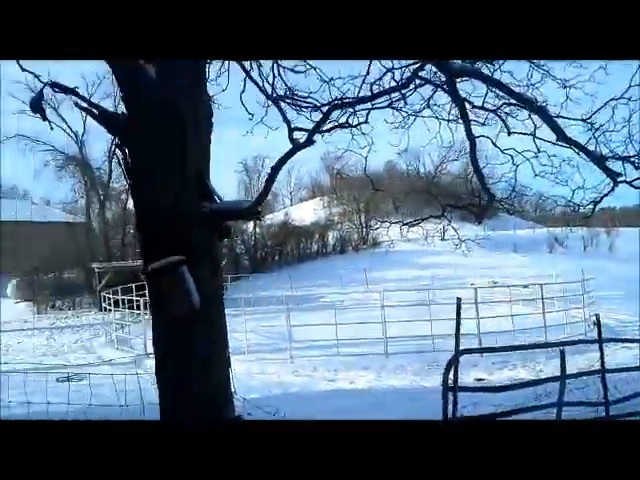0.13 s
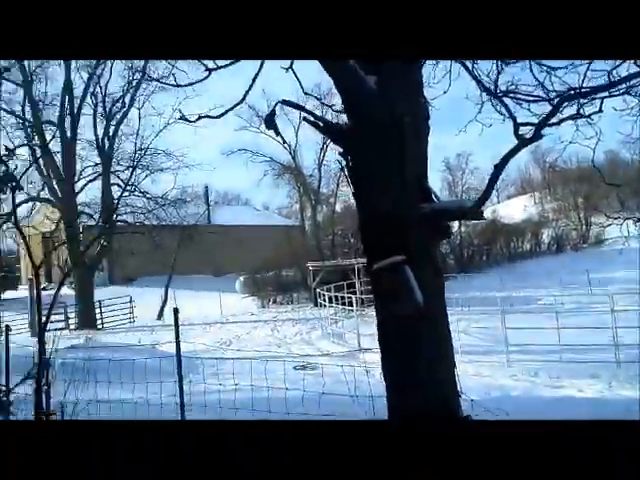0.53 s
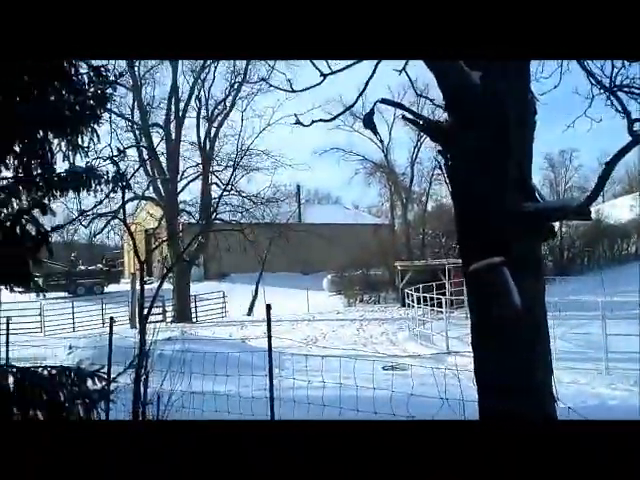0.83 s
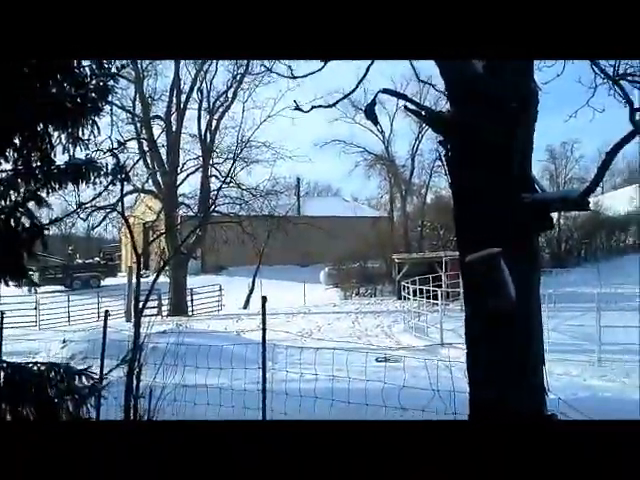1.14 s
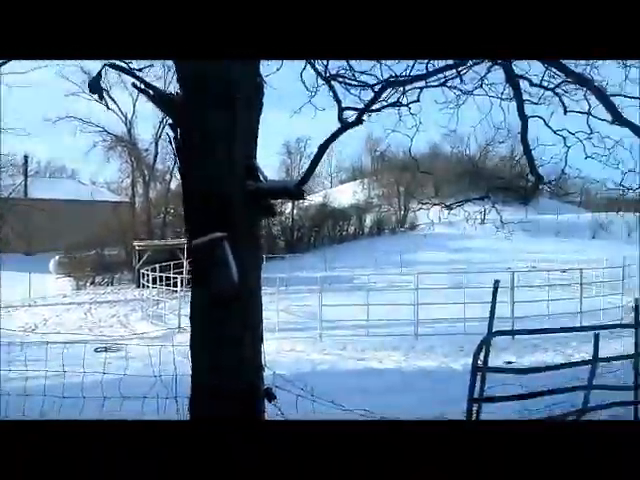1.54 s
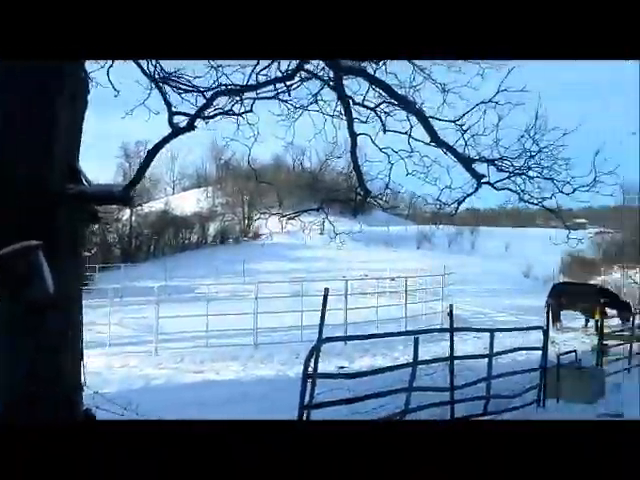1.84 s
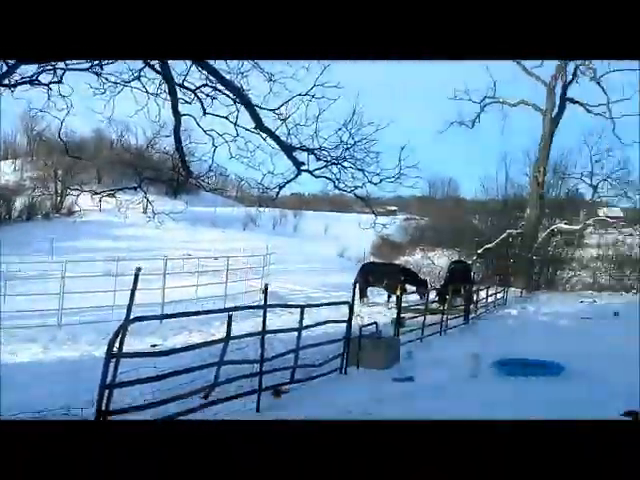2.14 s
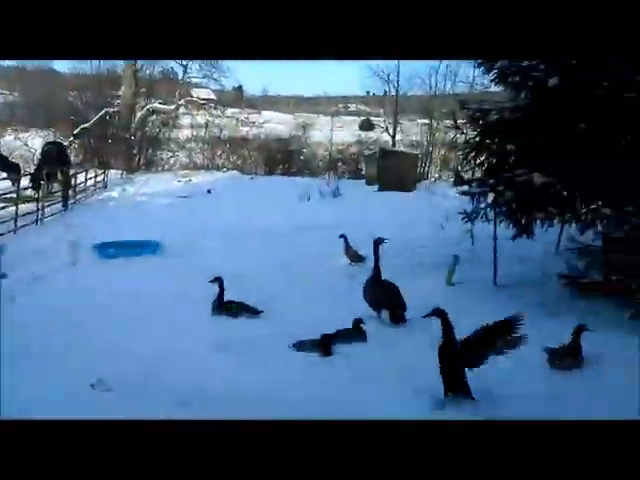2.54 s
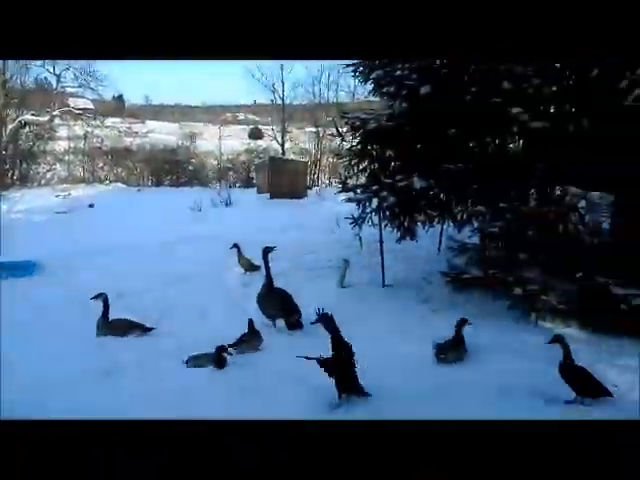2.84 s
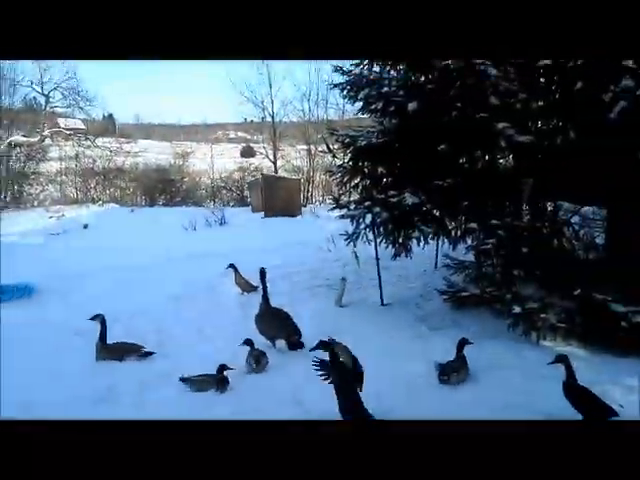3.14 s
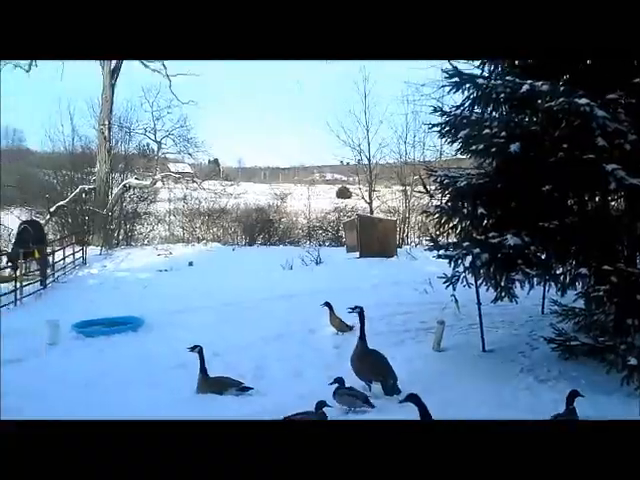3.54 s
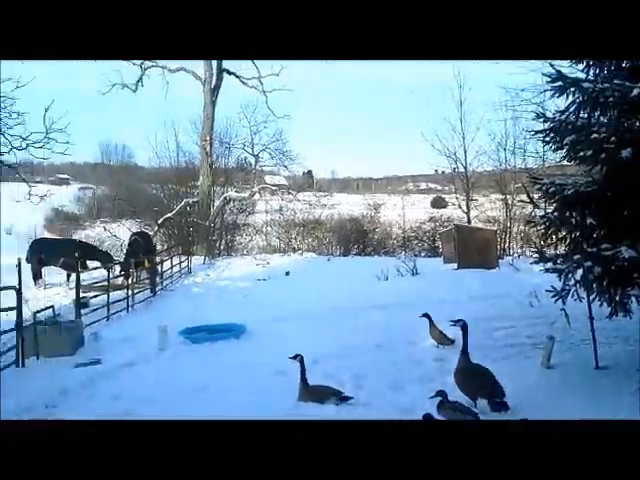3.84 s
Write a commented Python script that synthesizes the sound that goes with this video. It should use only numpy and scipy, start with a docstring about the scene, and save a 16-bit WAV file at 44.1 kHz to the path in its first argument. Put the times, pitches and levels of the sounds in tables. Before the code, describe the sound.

Goose honks, loud and rough, break out in short separate bursts across a quiet snowy yard.

```python
"""Geese in a snowy farmyard

Geese honk: grouped membrane pulses growl through throat and beak, then break into overtones that sag at the end.
A second goose answers, and ducks and far birds quack in short pulse trains through a bill resonance.
Snow crunches in bursts of coloured noise; wind rumbles and puffs on the microphone over an outdoor hiss.
Ground, fences, barn and slope return delayed copies, and the yard adds scattered noise-tail echoes."""
import sys
import numpy as np
from scipy import signal
from scipy.fft import rfft, irfft, next_fast_len
from scipy.io import wavfile
from scipy.ndimage import map_coordinates

SR = 44100
rng = np.random.default_rng(int(sys.argv[2]) if len(sys.argv) > 2 else 0)


def dump_mix(stems):
    """Bounce the given channels to the path in sys.argv[1] as a 16-bit WAV at rate SR."""
    frames = np.atleast_2d(stems).T  # one column per channel
    limited = np.clip(frames, -1, 1)  # hard clip at full scale
    pcm = np.round(limited * 32767).astype(np.int16)
    wavfile.write(sys.argv[1], SR, pcm)


N = 176400

# reflections off ground and fences close to the birds: (delay [s], level [dB])
EARLY_ECHOES = [(.0021, -7.5), (.0047, -14.5), (.0083, -17), (.013, -23.5), (.019, -13.5)]


def amp(db):
    """Decibels to an amplitude factor."""
    return 10 ** (np.asarray(db) / 20)


def unit(x):
    """x scaled to rms 1."""
    return x / np.sqrt(np.mean(x ** 2) + 1e-20)


def along(points, hz):
    """Interpolates (Hz, value) points on a log frequency axis."""
    f, v = np.transpose(points)
    return np.interp(np.log(hz + 1), np.log(f + 1), v)


def stretch(rows):
    """First sample, and one value per sample for each column after the time."""
    s, *cols = np.transpose(rows)
    start = round(s[0] * SR)
    t = np.arange(start, min(N, round(s[-1] * SR))) / SR
    return start, [np.interp(t, s, c) for c in cols]


def wobble(n, rate):
    """A smooth random curve, rate knots a second."""
    knots = rng.standard_normal(int(n * rate / SR) + 4)
    return map_coordinates(knots, [np.arange(n) * rate / SR])


def filtered(x, response):
    """x times a complex response of frequency."""
    n = x.shape[-1]
    m = next_fast_len(n + 8192)
    return irfft(rfft(x, m) * response(np.fft.rfftfreq(m, 1 / SR)), m)[..., :n]


def resonant(x, peaks):
    """x through parallel squared band-passes (centre Hz, width Hz, dB) of alternating sign, rms 1."""
    def band(f, centre, width):
        return 1j * f * width / (centre * centre - f * f + 1j * f * width)

    def response(f):
        return sum((-1) ** k * amp(db) * band(f, centre, width) ** 2
                   for k, (centre, width, db) in enumerate(peaks))

    return unit(filtered(x, response))


def coloured(spectrum, n=N):
    """Noise of rms 1 shaped by a (Hz, dB) spectrum."""
    return unit(filtered(rng.standard_normal(n), lambda hz: amp(along(spectrum, hz))))


def add(track, start, x):
    """Mixes x in, with 2 ms fades at its ends."""
    edge = np.arange(len(x))
    fade = np.clip(np.minimum(edge, edge[::-1]) / 90, 0, 1)
    track[start:start + len(x)] += (x * fade)[:len(track) - start]


def copies(x, echoes):
    """Delayed, weaker copies of x, alternate ones inverted, as from single reflecting surfaces."""
    return filtered(x, lambda hz: sum((-1) ** k * amp(db) * np.exp(-2j * np.pi * hz * s)
                                      for k, (s, db) in enumerate(echoes)))


def hiss():
    """The outdoor floor: coloured noise whose level drifts."""
    # floor level: (time [s], level [dB])
    hiss_level = [(0, -49.5), (.3, -47), (.6, -52.5), (.85, -59), (1.0, -56.5), (1.6, -52), (1.9, -53.5),
                  (2.2, -54.5), (2.4, -49.5), (2.6, -45), (3.1, -44), (3.3, -54), (3.45, -55), (4, -44.5)]
    # relative spectrum of the floor: (frequency [Hz], density [dB per Hz])
    hiss_spectrum = [(180, -22.5), (300, -13.5), (353, -3), (784, -6.5), (865, -21), (1050, -6.5),
                     (1690, -8.5), (3630, -13.5), (7670, -10.5), (14700, -23)]
    _, (db,) = stretch(hiss_level)
    db = np.pad(db, (0, N - len(db)), "edge")
    return amp(db + 1.5 * wobble(N, 6.6)) * coloured(hiss_spectrum)


def wind():
    """Wind on the microphone: a lumpy noise rumble, with brief low swings standing out as puffs."""
    # rumble level: (time [s], level [dB])
    rumble_level = [(0, -42), (.05, -40.5), (.19, -49.5), (.28, -45.5), (.42, -42.5), (.5, -57), (.57, -52),
                    (.64, -56), (.79, -62), (.87, -54.5), (1.1, -66), (1.32, -73), (1.4, -58.5), (1.6, -59),
                    (1.66, -48), (1.72, -53), (1.8, -37), (1.88, -53.5), (1.97, -37.5), (2.04, -51),
                    (2.1, -52), (2.3, -52), (2.36, -46.5), (2.44, -54), (2.5, -69), (2.6, -40.5),
                    (2.72, -36), (2.83, -57), (3.0, -44.5), (3.33, -52), (3.41, -61), (3.48, -45.5),
                    (3.85, -48.5), (3.96, -35), (4, -43)]
    # relative spectrum of the rumble: (frequency [Hz], density [dB per Hz])
    rumble_spectrum = [(15, -56.5), (25, -29.5), (59, -11.5), (147, 8), (292, 5.5), (425, -0.5), (609, -7),
                       (900, -7), (1170, -52), (1980, -120)]
    # single puffs: (time [s], envelope peak [dB], frequency [Hz])
    puff_rows = [(0.023, -33, 292), (0.042, -27.5, 270), (0.089, -22, 334), (0.241, -23.5, 325),
                 (0.273, -33, 226), (0.304, -26.5, 290), (0.356, -22, 301), (0.403, -26.5, 252),
                 (0.552, -30, 218), (0.583, -25.5, 262), (1.374, -38, 302), (1.645, -16, 231),
                 (1.684, -31, 197), (1.788, -27.5, 358), (1.807, -25, 326), (1.834, -23, 334),
                 (1.85, -54, 151), (1.904, -28.5, 250), (1.979, -37, 164), (2.009, -30.5, 274),
                 (2.101, -29, 326), (2.345, -24.5, 214), (2.408, -28.5, 288), (2.613, -13, 376),
                 (3.053, -22.5, 343)]
    lump_db = 4
    puff_cycles, puff_rise_s = 0.56, 0.00451  # Gaussian 1/e half-width in cycles, time from onset to centre
    _, (db,) = stretch(rumble_level)
    db = np.pad(db, (0, N - len(db)), "edge")
    lumpy = amp(lump_db * wobble(N, 35)) * coloured(rumble_spectrum)
    out = amp(db) * unit(lumpy)
    t = np.arange(-600, 600) / SR
    for s, peak_db, hz in puff_rows:
        swing = np.sin(2 * np.pi * hz * t + rng.uniform(0, 2 * np.pi))
        puff = np.exp(-(t * hz / puff_cycles) ** 2) * swing
        add(out, max(0, round((s + puff_rise_s) * SR) - 600), amp(peak_db) * puff)
    return out


def yard(x, share, delay_s):
    """Scattered echoes; each frequency dies at its own speed, and moving air blurs the lines."""
    # yard decay time before scaling by share: (frequency [Hz], t60 [s])
    yard_t60 = [(400, 0.4), (1300, 0.65), (4000, 0.43), (8000, 0.41), (13000, 0.26)]
    # tone of what the yard sends back: (frequency [Hz], gain [dB])
    echo_colour = [(600, -1.5), (1300, -3), (3000, 4), (7000, 0.5), (12000, 8.5)]
    blur, blur_rate = .18, 70  # amplitude depth, knots a second
    blurred = x * (1 + blur * wobble(N, blur_rate))
    hz, t, z = signal.stft(rng.standard_normal(SR), SR, nperseg=256)
    decay = amp(-60 * t / (share * along(yard_t60, hz)[:, None]))
    tail = signal.istft(z * decay, SR, nperseg=256)[1]
    tinted = filtered(blurred, lambda f: amp(along(echo_colour, f)))
    delayed = np.pad(tinted, (round(delay_s * SR), 0))
    return signal.fftconvolve(delayed, tail / np.linalg.norm(tail))[:N]


def crunches():
    """Snow under feet: short bursts of coloured noise with fast rise, slower decay and a gritty level."""
    # snow crunches: (onset [s], nominal level [dB], nominal length [s])
    crunch_rows = [(0.094, -45, 0.03), (0.257, -39, 0.037), (0.286, -37.5, 0.045), (0.5, -49, 0.016),
                   (0.866, -54, 0.019), (2.231, -44.5, 0.02), (2.942, -31, 0.013), (2.996, -34, 0.016),
                   (3.097, -31, 0.035)]
    # relative spectrum of crushed snow: (frequency [Hz], density [dB per Hz])
    crunch_spectrum = [(290, -32), (500, -4), (1630, 2.5), (1780, -7), (4020, -4.5), (7580, 2),
                       (14500, -21)]
    out = np.zeros(N)
    for s, db, length in crunch_rows:
        t = np.arange(round(3 * length * SR)) / SR
        u = t / (0.15 * length)
        grit = amp(db + 6 + 4.3 * wobble(len(t), 1033))
        add(out, round(s * SR), grit * u * np.exp(-u) * coloured(crunch_spectrum, len(t)))
    return out


def pulses(rate_hz, group, between_db, rough, sharp):
    """Unsteady membrane pulses in groups, mixed with noise gated once a group: throat and beak feeds."""
    jitter, scatter_db = .006, 1.5  # relative wander of the rate, wander of the level
    even_hz = 1060  # above this the lines between the pulse harmonics draw level with them
    n = len(rate_hz)
    unsteady_hz = rate_hz * (1 + jitter * (1 + 3 * rough) * wobble(n, 122.4))
    turns = np.cumsum(unsteady_hz) / SR
    k = np.arange(1, int(12000 / rate_hz.max()))[:, None]
    between = amp(between_db * np.minimum(1, even_hz / (k * rate_hz.mean())))
    lines = np.where(k % group == 0, 1, between) * np.cos(2 * np.pi * k * turns)
    clean = unit(lines.sum(0))
    gate = np.exp(sharp * np.cos(2 * np.pi * turns))
    gated = unit(gate * rng.standard_normal(n))
    rough = np.clip(rough, 0, 1)
    size = amp(scatter_db * wobble(n, 157.4))
    low = size * np.sqrt(1 - rough) * clean + np.sqrt(rough) * gated
    high = size * (1 - rough) * clean + gated
    return low, high


def quacks():
    """Ducks and far birds: short nasal pulse trains of falling rate through bill resonances."""
    # calls: (onset [s], length [s], mid-call pulse rate [Hz], level [dB], treble [dB],
    # roughness [0-1], bill resonance [Hz])
    quack_rows = [(0.034, 0.055, 760, -44, -12, 0.65, 1500), (0.379, 0.062, 757, -44, -14, 0.27, 2140),
                  (0.529, .13, 90.5, -53, -6.5, 0.9, 1680), (0.719, 0.076, 89.6, -53.5, -27, 0.3, 1790),
                  (1.008, 0.057, 383.5, -41, -31, 0.2, 1400), (1.408, 0.066, 103, -39.5, -7, 0.76, 1730),
                  (1.61, 0.0727, 84.9, -45.5, -6, 0.8, 1900), (1.728, 0.09, 247.2, -34.5, -6, 0.46, 2020),
                  (2.016, 0.072, 74.6, -56, -25.5, 0.4, 1500), (2.082, 0.082, 74.4, -51, -14, 0.54, 1770),
                  (2.782, 0.097, 106.5, -41, -20, 0.13, 2800), (2.938, 0.036, 208.6, -33.5, -6, 0.77, 2040),
                  (2.962, 0.043, 210.7, -30.5, -0.5, 0.76, 2030), (3.379, 0.17, 100.8, -53, -29, 0.8, 1500)]
    bill_width = .24  # of the resonance frequency
    rise_s, fall_s, floor = 0.03, 0.018, .25  # the rise starts from the floor
    out = np.zeros(N)
    for s, length, rate, db, treble, rough, hz in quack_rows:
        t = np.arange(round(length * SR)) / SR
        glide = 1.04 - .08 * t / length + 0.0397 * wobble(len(t), 89.6)
        low, high = pulses(rate * glide, 1, 0 * t, rough + 0 * t, sharp=0.55)
        bill = [(0.37 * hz, 450, -2), (0.73 * hz, 450, -2), (hz, bill_width * hz, 0),
                (1.335 * hz, 600, -7), (1.93 * hz, 1500, -13)]
        swell = np.clip(np.minimum(t / rise_s + floor, (length - t) / fall_s), 0, 1)
        shape = swell * amp(1.8 * wobble(len(t), 54))
        nasal = resonant(low, bill)
        bright = resonant(high, [(5450, 2700, 4.8), (6740, 3100, 0.5)])
        # the treble follows the shape twice, so it swells later and fades sooner
        add(out, round(s * SR), amp(db) * shape * (nasal + amp(treble) * shape * bright))
    return out + .6 * copies(out, EARLY_ECHOES)


def growls():
    """The rough start of each honk: grouped pulses through a throat and beak that open when loud."""
    # growls: (pulses a group, rows of (time [s], group rate [Hz], level [dB], treble [dB],
    # lines between the pulse harmonics [dB], roughness [0-1])); lone pulses are the second goose
    growl_rows = [ (3, [(1.04, 116.8, -50, -9, -7, 0.25), (1.09, 122.6, -38.5, -13, 3, 0.56),
                  (1.15, 135.6, -23, -17.5, -7.5, 0.34), (1.19, 141.3, -22.5, -14.5, -17, 0.34),
                  (1.23, 145.3, -19.5, -15, -15, 0.1), (1.255, 146, -43, -20, -7, 0.2)]),
                  (5, [(1.225, 124.6, -25.5, -15, -8, 0.2), (1.26, 129.6, -17, -11, -1, 0.11),
                  (1.3, 128.6, -25, -1, -5, 0), (1.32, 133, -60, -19, 5, 0.1)]),
                  (4, [(2.464, 100.7, -52, -17, -9, 0.39), (2.474, 98.67, -32.5, -13, -8.5, 0.54),
                  (2.5, 100.6, -25.5, -23.5, -15.5, 0), (2.55, 103.6, -22.5, -20, -18, 0.13),
                  (2.59, 105.9, -21.5, -15, -31, 0.37), (2.62, 107.5, -20.5, -14.5, -2, 0.3),
                  (2.65, 106.9, -14, -13, -2.5, 0.15), (2.683, 111.3, -21.5, 0, 0.5, 0.2),
                  (2.70, 107, -64, -13, 5, 0.2)]), (1, [(3.452, 129.2, -42, -37, -6, 0.54),
                  (3.465, 129.9, -19.5, -21.5, 0, 0.5), (3.495, 140.7, -25, -15.5, 0, 0),
                  (3.53, 145.2, -26.5, -21.5, -5, 0.28), (3.58, 150, -28, -18.5, 0, 0.17),
                  (3.61, 146.2, -20, -18.5, 0, 0.38), (3.645, 140.6, -12.5, -12.5, 0, 0.38),
                  (3.66, 140.3, -11, 4, 0, 0.63), (3.68, 135, -60, -18, -2, 0.54)]),
                  (4, [(3.605, 93.54, -23, -28, -28, 0), (3.63, 94.75, -15.5, -25, -29, 0),
                  (3.69, 102.5, -22.5, -6, -20, 0.05), (3.74, 106.9, -18.5, -20, -18, 0.37),
                  (3.79, 109.7, -28, -6, 10.5, 0.29), (3.81, 108.2, -27, -16, -7, 0.1),
                  (3.83, 113, -50, -15, -6, 0.3)])]
    # resonances of throats and beak, closed and open, and of the second goose's throat:
    # (centre [Hz], width [Hz], level [dB])
    throat_closed = [(436, 135, -4), (766, 412, 5.5), (1150, 540, -3), (1610, 262, 1)]
    throat_open = [(448, 167, -10.5), (815, 115, -8.5), (1156, 114, 14), (1500, 500, -3), (1790, 77, 2)]
    throat_second = [(445, 106, -14.5), (760, 150, 2.5), (980, 180, 3), (1280, 323, 3), (2680, 1440, -21)]
    beak_closed = [(3605, 350, 15.5), (5180, 1330, 16.5), (6860, 1600, 5), (2560, 440, -19)]
    beak_open = [(2380, 800, -3), (4010, 1460, 0.5), (6000, 1040, 4.5), (6730, 1400, -3), (10500, 920, -38)]
    opens_db, opens_over_db = -22, 8  # growl level where opening starts, and the range to fully open
    out = np.zeros(N)
    for group, rows in growl_rows:
        start, (rate, db, treble, between, rough) = stretch(rows)
        low, high = pulses(rate, group, between, rough, sharp=0.7)
        wide = np.clip((db - opens_db) / opens_over_db, 0, 1)
        shut_gain, open_gain = np.sqrt(1 - wide), np.sqrt(wide)
        beak = shut_gain * resonant(high, beak_closed) + open_gain * resonant(high, beak_open)
        if group == 1:
            throat = resonant(low, throat_second)
        else:
            throat = shut_gain * resonant(low, throat_closed) + open_gain * resonant(low, throat_open)
        add(out, start, amp(db) * (throat + amp(treble) * beak))
    return out + copies(out, EARLY_ECHOES)


def notes():
    """The clear end of each honk: gliding overtones, raspier where weak, lifted by the windpipe."""
    # clear notes, each a list of (time [s], pitch [Hz], nominal level of the strongest overtone [dB],
    # treble [dB])
    note_rows = [
        [(1.215, 621, -25, -33), (1.255, 645.4, -14.5, -16), (1.288, 629, -11, -11), (1.305, 639, -10, -2),
         (1.34, 641.7, -16, 1), (1.358, 629.5, -15, 1), (1.367, 609.4, -23, 3), (1.376, 576, -27.5, -4),
         (1.405, 523, -37.5, -5)],
        [(2.61, 639.7, -28.5, -6), (2.665, 642.5, -13, -14), (2.68, 635.3, -11, -1), (2.72, 645.4, -11, 0),
         (2.745, 641, -16.5, 6.5), (2.755, 615, -21.5, 8), (2.765, 588, -27, 2), (2.785, 525, -51.5, -22.5)],
        [(3.638, 704.5, -10, -29), (3.655, 705, -13.5, -3), (3.675, 701.6, -10.5, -1),
         (3.70, 695.4, -12.5, -3.5), (3.71, 674, -28, -2.5), (3.722, 680, -40, -12)],
        [(3.745, 635.5, -20, -18), (3.802, 625.3, -15, -16.5), (3.815, 636, -13, -0.5),
         (3.86, 645.2, -8.5, -3.5), (3.882, 640.4, -14, 1.5), (3.892, 608, -18.5, 2), (3.9, 595, -29, -13),
         (3.92, 524, -30, -16)],
    ]
    # overtones of each note, as the head points: (multiple of the pitch, level [dB])
    overtone_rows = [
        [(1, -3), (2, 0.5), (3, -13.5), (4, -18), (5, -15.5), (6, -10), (7, -7), (8, -11.5), (9, -8), (10, -12),
         (11, -16.5), (12, -39), (13, -33), (14, -28.5), (15, -23.5), (16, -35.5), (17, -24.5), (18, -46.5),
         (19, -34), (20, -32), (21, -45.5), (22, -33.5)],
        [(1, -5.5), (2, 2.5), (3, -16), (4, -19.5), (5, -19.5), (6, -17), (7, -14.5), (8, -10), (9, -8),
         (10, -20.5), (11, -20), (12, -53.5), (13, -40), (14, -31), (15, -30.5), (16, -38), (17, -36.5),
         (18, -39.5), (19, -45.5), (20, -33), (21, -33), (22, -44)],
        [(1, -12.5), (2, 4), (3, -14), (4, -17), (5, -28), (6, -8.5), (7, -10), (8, -12), (9, -10), (10, -17),
         (11, -17.5), (12, -45), (13, -30.5), (14, -25), (15, -32), (16, -36), (17, -32), (18, -30), (19, -60),
         (20, -28)],
        [(1, -7.5), (2, 0), (3, -22), (4, -24), (5, -27), (6, -10), (7, -12), (8, -12.5), (9, -17), (10, -14),
         (11, -27), (12, -50), (13, -49), (14, -26.5), (15, -32), (16, -32), (17, -44.5), (18, -41), (19, -38),
         (20, -54), (21, -34), (22, -38)],
    ]
    # how far overtones 1, 2, 3 and the rest follow the treble: (share [0-1], one entry for each)
    treble_share = (0, .3, .5, 1)
    # base rasp depth: (overtones 1 and 2 [dB], higher ones [dB])
    rasp_db = (-38, -24)
    rasp_grows, rasp_most_db = 1.4, 18  # dB per dB under the note's peak, and the most added
    top_rasp_db = -9  # base rasp of overtones above the 11th
    pipe_hz, pipe_width_hz, pipe_db = 1784, 70, 15  # lifts an overtone sagging through it
    out = np.zeros(N)
    for rows, overtones in zip(note_rows, overtone_rows):
        start, (hz, db, treble) = stretch(rows)
        n = len(hz)
        rasp = np.minimum(rasp_grows * (db.max() - db), rasp_most_db)
        phase = 2 * np.pi * np.cumsum(hz * (1 + 0.0011 * wobble(n, 84.0))) / SR
        tone = np.zeros(n)
        for k, level in overtones:
            share = treble_share[int(min(k, len(treble_share))) - 1]
            flutter_db = (k > 2) * 2.3 * wobble(n, 35.7)
            lift_db = pipe_db * np.exp(-((k * hz - pipe_hz) / pipe_width_hz) ** 2)
            base_rasp = top_rasp_db if k > 11 else rasp_db[int(k > 2)]
            roughened = 1 + np.minimum(2, amp(rasp + base_rasp)) * wobble(n, 700)
            wave = np.sin(k * phase + 0.25 - 0.097 * k * k)
            tone += amp(level + treble * share + flutter_db + lift_db) * roughened * wave
        add(out, start, np.sqrt(2) * amp(db) * tone)
    return out


def scene():
    """Mixes all layers, and adds a very faint random-phase difference between the two channels."""
    # returns from barn and slope: (delay [s], level [dB])
    far_echoes = [(.07, -25), (.19, -38.5)]
    # side signal relative to the mid, before overlap-adding: (frequency [Hz], level [dB])
    side_db = [(100, -34), (1000, -67), (3000, -66), (12000, -42)]
    quack_echo_db = -6.5  # ducks stir less echo than the geese
    echo_db, echo_share, echo_delay_s = -16.5, 0.97, 0.025  # share of the yard's t60
    near_db, near_share, near_delay_s = -16.5, 0.26, .008  # quick scatter off fences and shrubs
    geese = growls() + notes()
    ducks = quacks()
    echoed = geese + amp(quack_echo_db) * ducks
    mid = geese + ducks
    mid += amp(echo_db) * yard(echoed, echo_share, echo_delay_s)
    mid += amp(near_db) * yard(echoed, near_share, near_delay_s)
    mid += copies(echoed, far_echoes)
    mid += crunches() + wind() + hiss()
    # random phases make a faint noisy side signal from the mid
    hz, _, z = signal.stft(mid, SR, nperseg=256)
    scrambled = z * np.exp(2j * np.pi * rng.random(z.shape)) * amp(along(side_db, hz))[:, None]
    side = signal.istft(scrambled, SR, nperseg=256)[1][:N]
    return np.array([mid + side, mid - side])


def record(dry):
    """The microphone: soft ceiling on the loudest peaks, two-stage bass roll-off, sharp band limit."""
    ceiling, knee = 1.71, 1.52  # amplitude approached, exponent of the bend
    mic_low_hz, top_hz = 46.4, 14880
    held = dry / (1 + np.abs(dry / ceiling) ** knee) ** (1 / knee)
    return filtered(held, lambda hz: (hz < top_hz) * (1j * hz / (mic_low_hz + 1j * hz)) ** 2)


dry = scene()
out = record(dry)
dump_mix(out)
```